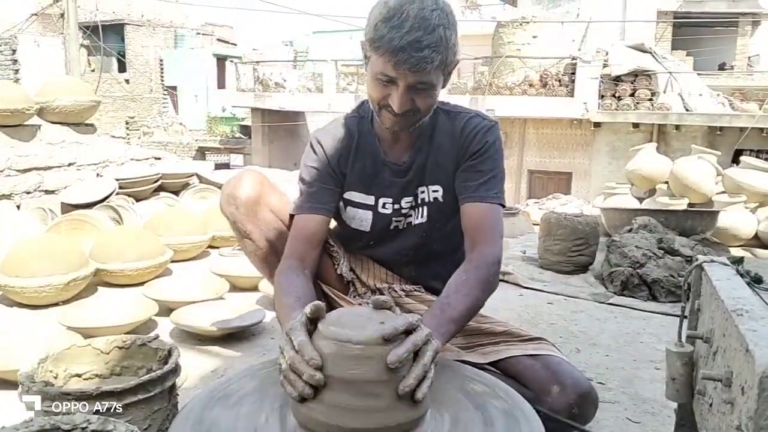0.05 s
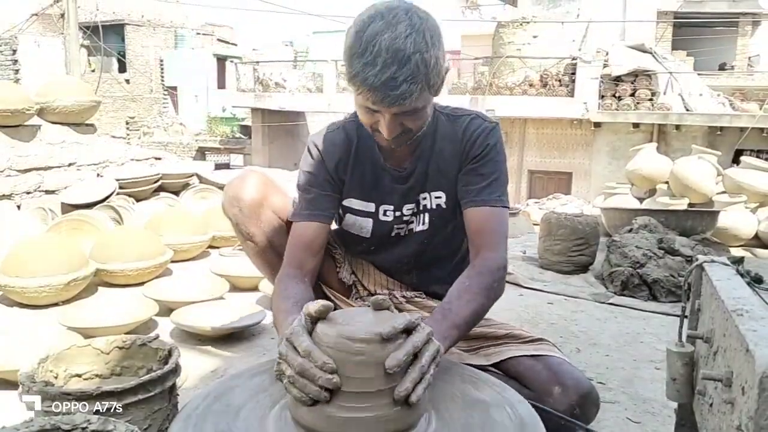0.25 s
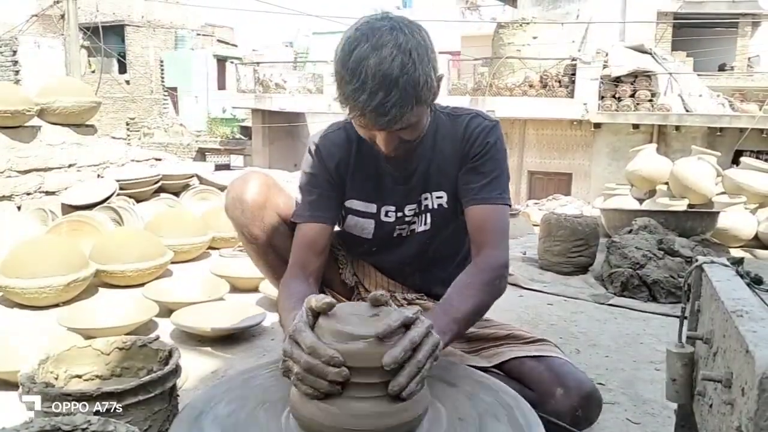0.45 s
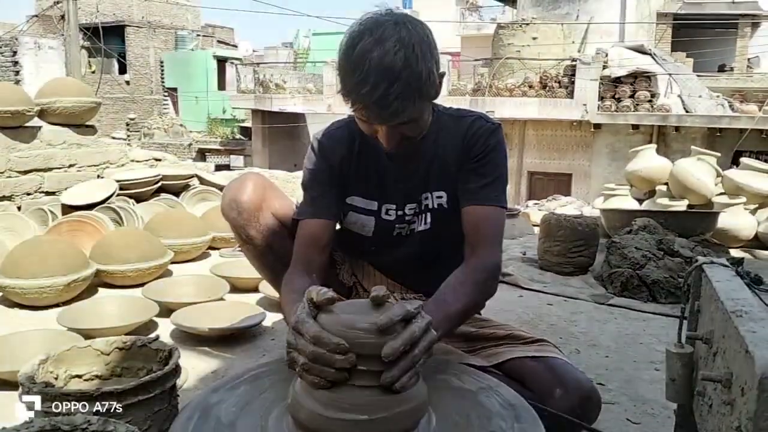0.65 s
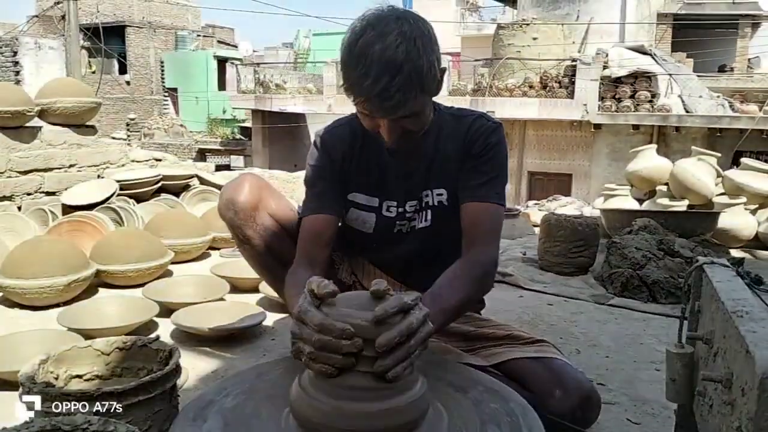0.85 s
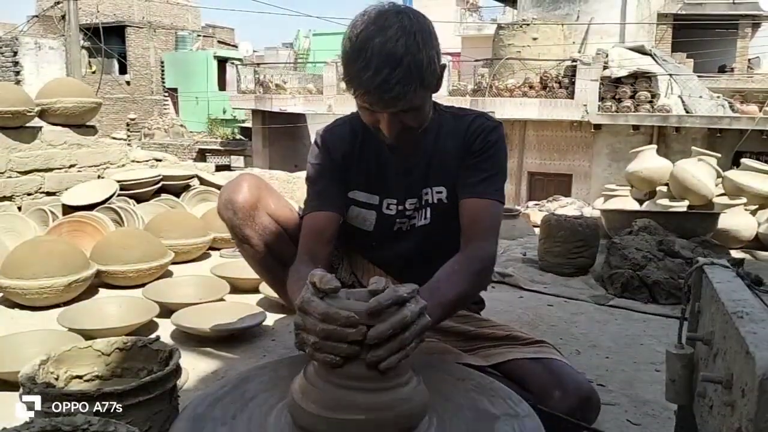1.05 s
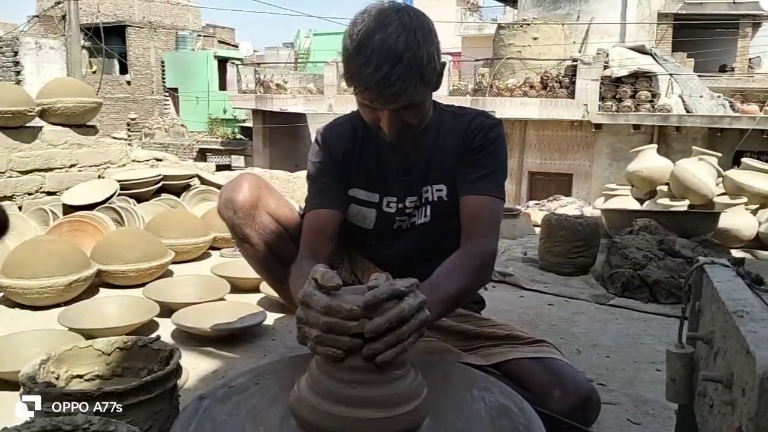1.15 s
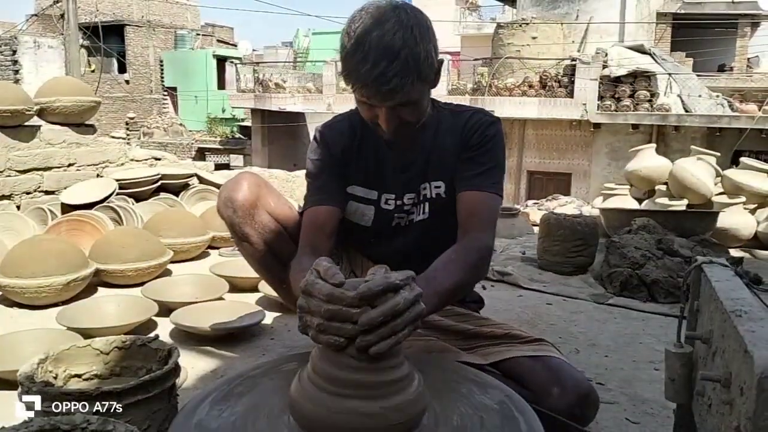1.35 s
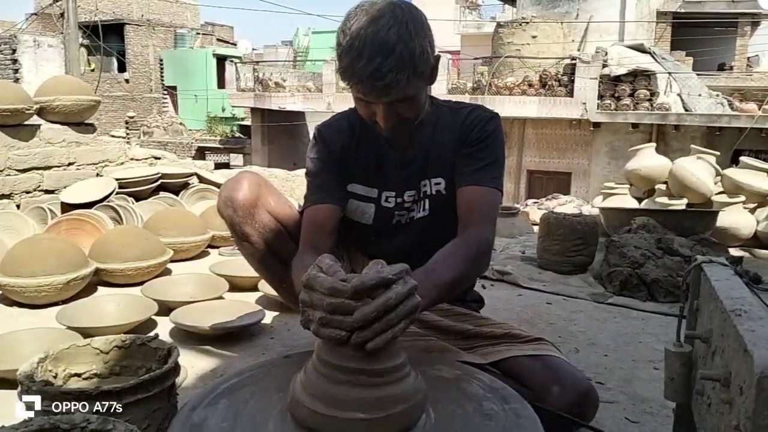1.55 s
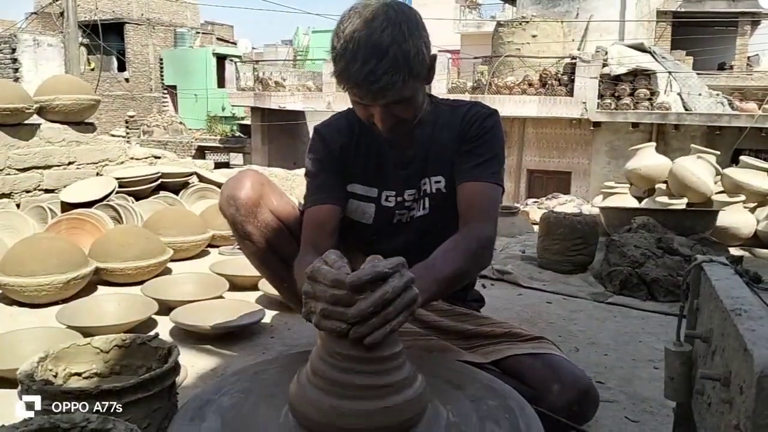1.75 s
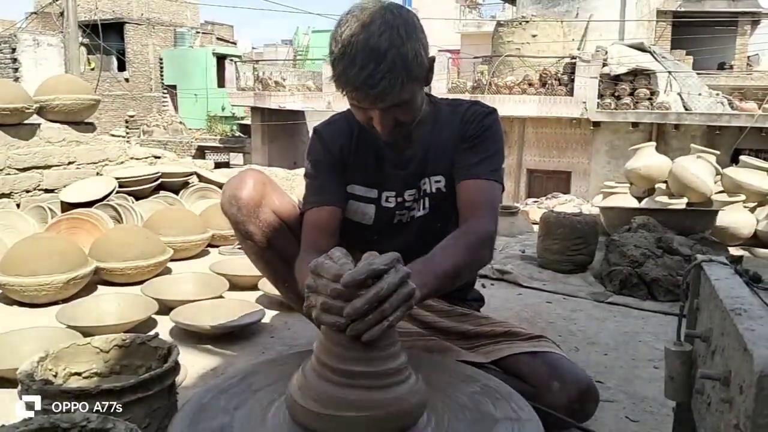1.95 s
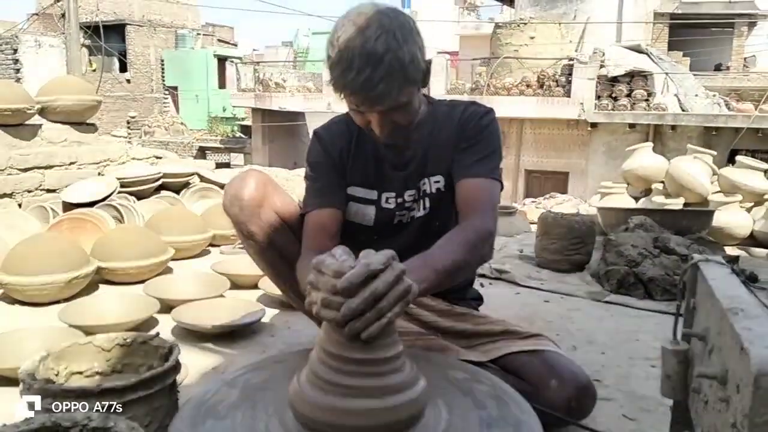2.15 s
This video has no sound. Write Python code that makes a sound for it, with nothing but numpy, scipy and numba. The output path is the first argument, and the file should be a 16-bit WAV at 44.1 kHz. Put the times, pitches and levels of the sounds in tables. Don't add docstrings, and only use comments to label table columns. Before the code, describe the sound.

Wind rumbles and thumps on a phone microphone in an open yard, strongest after the first second, over an electric potter's wheel's steady hissing whir, with gritty ticks, small wet slaps and two mid-way pottery knocks.

```python
import sys
import numpy as np
from scipy import signal
from scipy.fft import rfft, irfft
from scipy.io import wavfile
from scipy.ndimage import uniform_filter1d
from numba import njit

SR = 44100
rng = np.random.default_rng(int(sys.argv[2]) if len(sys.argv) > 2 else 0)


def pcm_store(signal):
    levels = np.round(np.clip(np.atleast_2d(signal), -1, 1) * 32767)
    wavfile.write(sys.argv[1], SR, levels.astype(np.int16).T)


def attenuation_scalar(level_db):
    decades = np.asarray(level_db, float) / 20
    return 10 ** decades


N = 97020
TIME_S = np.arange(N) / SR


@njit
def svf(x, hz, width_hz):
    y, band_state, low_state = np.empty(len(x)), 0., 0.
    g, k = np.tan(np.pi * hz / SR), width_hz / hz
    for i in range(len(x)):
        v = (band_state + g * (x[i] - low_state)) / (1 + g * (g + k))
        band_state = 2 * v - band_state
        low_state += 2 * g * v
        y[i] = k * v
    return y


@njit
def follow(x, start, rise, fall):
    y, e = np.empty(len(x)), start
    for i in range(len(x)):
        e += (abs(x[i]) - e) * (rise if abs(x[i]) > e else fall)
        y[i] = e
    return y


def level(x, db):
    return x * attenuation_scalar(db) / np.sqrt(np.mean(x ** 2))


def noise():
    return rng.standard_normal(N)


def band_noise(hz, width_hz, db):
    once = svf(noise(), 1. * hz, 0.94 * width_hz)
    return level(svf(once, 1. * hz, 0.94 * width_hz), db)


def walk(rate_hz):
    hold = int(SR / rate_hz)
    steps = np.repeat(rng.standard_normal(N // hold + 1), hold)[:N]
    w = uniform_filter1d(uniform_filter1d(steps, hold), hold)
    return (w - w.mean()) / w.std()


def colour(table):
    hz, db = np.array(table).T
    f = np.maximum(np.arange(N // 2 + 1) * SR / N, 1)
    shape_db = np.interp(np.log(f), np.log(hz), db, left=-90, right=-90)
    return level(irfft(rfft(noise()) * attenuation_scalar(shape_db), N), 0)


def burst(start_s, db, hold_s, release_s):
    t = TIME_S - start_s
    return attenuation_scalar(db) * np.clip(t * 3000, 0, 1) * np.exp(-np.maximum(t - hold_s, 0) / release_s)


def tap(start_s):
    return np.exp(-((TIME_S - start_s) / .00006) ** 2)


def ring(push, modes):
    t = np.arange(SR // 4) / SR
    body = sum(attenuation_scalar(db) * np.sin(2 * np.pi * hz * t) * 1000. ** (-t / t60_s) for hz, db, t60_s in modes)
    out = signal.fftconvolve(push, body)[:N]
    return out / np.abs(out).max()


def dull(x):
    return signal.sosfilt(signal.butter(6, 4600, fs=SR, output="sos"), x)


def contact_noise():
    return level(dull(svf(noise(), 3000., 4500.)), -1)


def eddy_shape(t, length_s):
    return (1 - np.exp(-(t / .003) ** 2)) * np.exp(-(t / (1.275 * length_s)) ** 3)


# time_s, gust_db
GUST = [(0, -34), (.25, -35.5), (.38, -31.5), (.48, -26.5), (.6, -39.5), (.69, -33), (.76, -36), (.94, -24),
        (.985, -36.5), (1.1, -27), (1.19, -17.5), (1.36, -16.5), (1.5, -26), (1.59, -16), (1.67, -21.5),
        (1.8, -32.5), (1.96, -23.5), (2.13, -34)]
# freq_hz, density_db_per_hz
RUMBLE = [(20, -2.5), (60, -1.5), (130, 5), (230, -4), (400, -7.5), (600, -25), (900, -61), (1300, -58)]
GUST_REF_DB, KNEE_HZ = -13, 150
BRIGHTEN = .55


def rumble():
    stir = sum(attenuation_scalar(db - 16) * eddy_shape(np.maximum(TIME_S - start_s, 0), length_s)
               for start_s, db, _, length_s in EDDIES + MORE_EDDIES)
    gust_db = 20 * np.log10(attenuation_scalar(np.interp(TIME_S, *np.array(GUST).T)) + stir)
    hzs, dbs = np.array(RUMBLE).T
    centres_hz = 24 * 2 ** np.arange(0, 5.9, .5)
    base_db = np.interp(np.log(centres_hz), np.log(hzs), dbs) + 10 * np.log10(centres_hz)
    base_db = base_db - 10 * np.log10(np.sum(attenuation_scalar(2 * base_db)))
    out, shared = 0, walk(28.25)
    for hz, db in zip(centres_hz, base_db):
        octaves_up = max(np.log2(hz / KNEE_HZ), -1)
        db = db + gust_db + BRIGHTEN * octaves_up * (gust_db - GUST_REF_DB)
        db = db + 1.5 * min(hz / KNEE_HZ, 1) * shared
        out = out + attenuation_scalar(db + 2 * walk(14.65)) * band_noise(hz, hz / 3, 1.5)
    return out


# freq_hz, density_db_per_hz
WHIR = [(500, -7.5), (650, 0.5), (1000, -10), (2200, -3.5), (4000, -10), (4500, -14), (6800, -22.5),
        (8700, -36.5), (9200, -46.5)]
# freq_hz, width_hz, level_db
FRAME = [(697, 180, -31), (796, 37, -4.5), (1212, 110, -6.5), (1530, 36, -10.5), (1833, 37, -25),
         (1910, 44, -3.5), (2287, 71, -4.5), (2590, 8.4, -27.5), (2644, 50, -7.5), (3378, 24, -13),
         (3880, 69, -13), (3730, 20, -23.5)]
TURN_HZ, TURN_DB = 6.6, 0.96


def wheel():
    turn_db = TURN_DB * np.sin(2 * np.pi * TURN_HZ * TIME_S + 0.26)
    hiss = attenuation_scalar(-40.5 + 0.5 * walk(28.05)) * colour(WHIR)
    frame = sum(attenuation_scalar(db + 1.5 * walk(14)) * level(svf(noise(), 1. * hz, 1. * width_hz), -44.5)
                for hz, width_hz, db in FRAME)
    shelf = signal.ellip(4, .5, 4.5, 8800, fs=SR, output="sos")
    return attenuation_scalar(turn_db) * signal.sosfilt(shelf, hiss + frame)


def yard():
    return attenuation_scalar(1.2 * walk(9.9)) * band_noise(340, 360, -55)


# freq_hz, density_db_per_hz
AIR = [(8500, -54), (10700, -17.5), (11300, 12.5), (12300, 6), (13600, 10), (15800, 3)]
# time_s, peak_db
TICKS = [(0.0168, -41.5), (0.0332, -47.5), (0.0966, -59), (0.114, -52.5), (0.138, -44.5), (0.1789, -43),
         (0.189, -50), (0.2348, -43.5), (0.2592, -53), (0.2757, -43), (0.3101, -47.5), (0.3424, -50.5),
         (0.3799, -47.5), (0.4218, -53), (0.4378, -45.5), (0.4787, -45.5), (0.4882, -40.5), (0.5044, -49),
         (0.5421, -45), (0.5815, -49), (0.624, -51), (0.6628, -47), (0.6814, -44), (0.7446, -45.5),
         (0.7616, -48), (0.7855, -48.5), (0.8419, -51.5), (0.9227, -50), (0.9581, -52), (0.9866, -49.5),
         (1.0285, -54), (1.0883, -52), (1.1208, -51), (1.1891, -46.5), (1.22, -49), (1.2444, -47),
         (1.272, -50.5), (1.2874, -44), (1.3408, -47.5), (1.3856, -45), (1.432, -60), (1.4729, -46),
         (1.5652, -49.5), (1.733, -49.5), (1.8366, -54.5), (1.9349, -53), (2.0796, -48), (2.1205, -43.5)]
GRIT_PER_S, GRIT_DB, GRIT_SPREAD_DB, GRIT_DECAY_S = 75, -63, 3., .0015


def grit():
    hit, size = rng.random(N), rng.exponential(size=N)
    gate = (hit < GRIT_PER_S / SR) * attenuation_scalar(GRIT_DB + GRIT_SPREAD_DB * np.minimum(size, 2))
    for time_s, db in TICKS:
        gate[int(time_s * SR)] += attenuation_scalar(db - 4.5)
    gate = signal.lfilter([1], [1, -np.exp(-1 / (GRIT_DECAY_S * SR))], gate)
    gate = uniform_filter1d(gate, size=60)
    return gate * (colour(AIR) + band_noise(7000, 3500, -1))


# start_s, peak_db, pitch_hz, length_s
EDDIES = [(0.217, -17.5, 157.6, 0.022), (0.28, -34, 141.5, 0.013), (0.314, -18, 106.3, 0.03),
          (0.347, -9.5, 153, 0.0076), (0.357, -13, 103, 0.035), (0.514, -6, 123, 0.0058),
          (0.624, -18.5, 102.6, 0.011), (0.762, -8, 106.6, 0.009), (0.906, -21.5, 161, 0.011),
          (1.011, -16.5, 118.8, 0.054), (1.063, -11, 170, 0.0065), (1.161, -4.5, 170.8, 0.012),
          (1.192, -17, 158, 0.015), (1.229, -16.5, 138.6, 0.0034), (1.261, -4.5, 259, 0.023),
          (1.293, -1.5, 235.4, 0.032), (1.337, -1.5, 178, 0.0082), (1.367, -29, 205, 0.01),
          (1.414, -3.5, 210, 0.01), (1.44, -3, 226, 0.014), (1.475, -4.5, 201.6, 0.015),
          (1.52, -11, 150, 0.019), (1.571, -18, 161.2, 0.086), (1.597, -7.5, 263, 0.012),
          (1.613, -5.5, 186, 0.022), (1.646, -4, 188, 0.008), (1.711, -13, 153, 0.016),
          (1.924, -15, 153, 0.015), (1.941, -11.5, 137, 0.0089), (2.037, -17.5, 138, 0.0076)]
# start_s, peak_db, pitch_hz, length_s
MORE_EDDIES = [(0.104, -22.5, 99, 0.011), (0.448, -23, 302, 0.014), (0.476, -15, 252, 0.0046),
               (0.918, -23, 358, 0.0054), (0.952, -25, 110, 0.019), (1.129, -21.5, 166, 0.02),
               (1.349, -5.5, 303, 0.015), (1.542, -17, 284, 0.018), (1.987, -30, 278, 0.016),
               (0.371, -15, 82, 0.015), (1.172, -16.5, 70.7, 0.011), (1.422, -7.5, 99.3, 0.039),
               (1.457, -3, 141, .01), (1.546, -13.5, 80.6, 0.016), (1.826, -20.5, 126.6, 0.0057),
               (1.871, -32, 125, 0.011), (2.165, -19.5, 72.6, 0.022), (0.731, -26, 241.5, 0.034),
               (1.399, -18, 276, 0.01), (1.028, -20.5, 60, 0.012), (1.09, -15, 200, 0.01),
               (1.257, -11, 60, 0.042), (0.398, -23.5, 70, 0.021), (1.955, -20, 150, 0.016),
               (1.967, -28.5, 340, 0.012)]
EDDY_SAG, EDDY_EDGE = 0.085, 0.21
FLUTTER_HZ, FLUTTER_DB, FLUTTER_S, FLUTTER_GROWTH = 560, -17.5, 0.0079, 2.9


def eddies():
    out, t = np.zeros(N + SR), np.arange(SR // 5) / SR
    rough = band_noise(FLUTTER_HZ, FLUTTER_HZ, FLUTTER_DB)
    edge_shape = np.minimum(t * 800, 1) * np.exp(-t / FLUTTER_S)
    for start_s, db, hz, length_s in EDDIES + MORE_EDDIES:
        cycles = np.log1p(EDDY_SAG * 1.25 * hz * t) / EDDY_SAG
        phase = 2 * np.pi * (cycles + .3 * rng.random() - .2)
        swing = (np.sin(phase) - EDDY_EDGE * np.cos(2 * phase)) * eddy_shape(t, length_s)
        i = int((start_s - .002) * SR)
        edge = rough[i:i + len(t)] * edge_shape[:N - i]
        out[i:i + len(t)] += attenuation_scalar(db + 0.5) * swing
        out[i:i + len(edge)] += attenuation_scalar(FLUTTER_GROWTH * db) * edge
    return out[:N]


# start_s, peak_db, length_s
SLAPS = [
    (0.483, -36, 0.0071),
    (0.64, -48.5, 0.013),
    (0.741, -32.5, 0.003),
    (0.862, -45.5, 0.0025),
    (1.002, -38, 0.031),
    (1.177, -37, .004),
    (1.257, -35.5, .004),
    (1.817, -39, 0.02),
    (2.104, -37, 0.01),
    (2.143, -39.5, 0.006),
]


def slaps():
    shape = sum(burst(start_s, db, length_s / 2, length_s / 2) for start_s, db, length_s in SLAPS)
    return dull(shape * band_noise(3000, 2400, 0))


def drip():
    return attenuation_scalar(-25) * ring(tap(.62), [(1050, 0, .045), (1.2 * 1050, -4, .045 / 2)])


# freq_hz, level_db, t60_s
SHARD = [(552, 0, .045), (860, -8, .02), (1160, -5, .03), (1470, -4, .03), (1950, -5, .03), (2760, -7, .03),
         (3420, -7, .025), (4300, -6, .025)]
SCRAPE_S, SCRAPE_AGAIN_S = .7115, .7172


def shard_knock():
    scrape = burst(SCRAPE_S, -25, .003, .002) + burst(SCRAPE_AGAIN_S, -26.5, .003, .003)
    tail = burst(SCRAPE_S, -34, .01, .02)
    mids = contact_noise()
    top = band_noise(13500, 3000, -17) + band_noise(7300, 2000, -22)
    push = tap(SCRAPE_S) + .7 * tap(SCRAPE_AGAIN_S + .0015)
    return scrape * (mids + top) + tail * mids + attenuation_scalar(-15) * ring(push, SHARD)


# freq_hz, level_db, t60_s
POT = [(362, 0, .07), (400, -5, .1), (465, -14, .05), (545, -12, .06), (760, -16, .04), (1050, -13, .04),
       (1228, -12, .05), (1535, -11, .05), (1675, -12, .03), (2430, -19, .03), (3250, -9, .022)]
KNOCK_S, PUSH_DELAY_S, BOUNCE_S = .8118, .0022, .0054


def pot_knock():
    push_s = KNOCK_S + PUSH_DELAY_S
    push = .15 * tap(KNOCK_S + .0003) + tap(push_s) + .4 * tap(push_s + BOUNCE_S)
    crack = burst(KNOCK_S, -28, .002, .009) * svf(contact_noise(), 1600., 3000.)
    return dull(crack) + attenuation_scalar(-7.5) * dull(ring(push, POT))


# start_s, peak_db
SNAPS = [(1.159, -29.5), (1.263, -15), (1.295, -12.5), (1.337, -14.5), (1.353, -22), (1.395, -31),
         (1.41, -27), (1.441, -17), (1.599, -16), (1.618, -24), (1.645, -32)]


def snaps():
    shape = sum(burst(start_s, db - 3.5, hold_s=0.00067, release_s=0.007) for start_s, db in SNAPS)
    low_pass = signal.butter(4, 950, fs=SR, output="sos")
    return signal.sosfilt(low_pass, shape * band_noise(556, 556, 0))


def scene():
    wind = rumble() + eddies() + snaps()
    hands = slaps() + drip() + shard_knock() + pot_knock()
    return (wind + wheel() + yard() + grit() + hands)[None]


def top_cut(x):
    return signal.sosfilt(signal.butter(12, 15960, fs=SR, output="sos"), x)


DUCK_TOP_DB, DUCK_RATIO, DUCK_S, RECOVER_S = -20, 1.35, .15, 3.
CEILING = 1.02


def record(dry):
    top = attenuation_scalar(DUCK_TOP_DB)
    envelope = follow(dry[0], .5 * top, 1 / (DUCK_S * SR), 1 / (RECOVER_S * SR))
    gain = np.minimum(top / envelope, 1) ** (1 - 1 / DUCK_RATIO)
    held = dry * gain * 1.074
    held = held / (1 + (held / CEILING) ** 4) ** (1 / 4)
    hiss = attenuation_scalar(-69.5 + 1.2 * walk(25)) * colour(AIR)
    return top_cut(held + hiss)


dry = scene()
out = record(dry)
pcm_store(out)
```